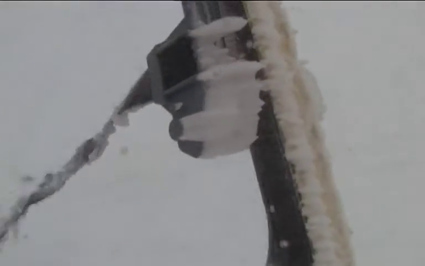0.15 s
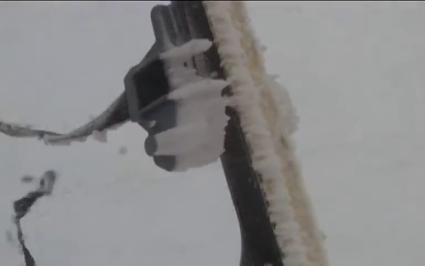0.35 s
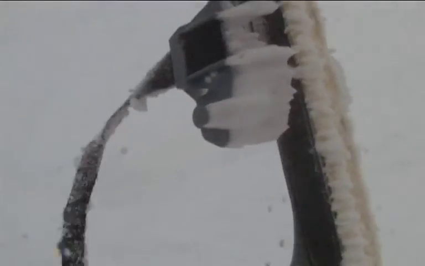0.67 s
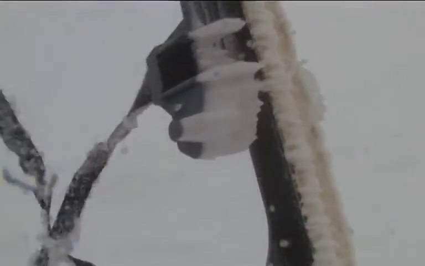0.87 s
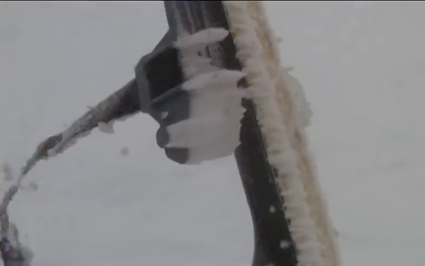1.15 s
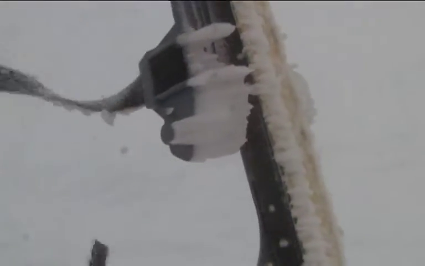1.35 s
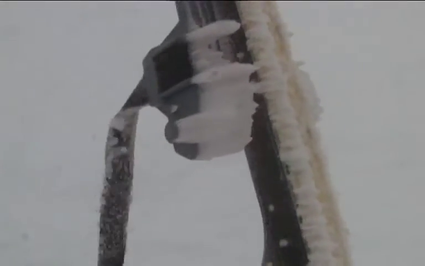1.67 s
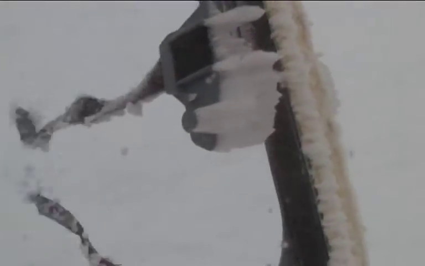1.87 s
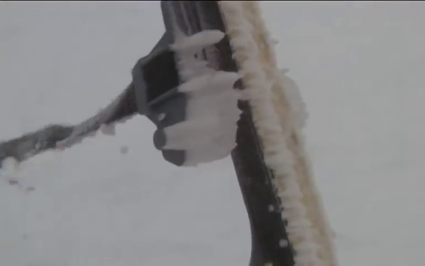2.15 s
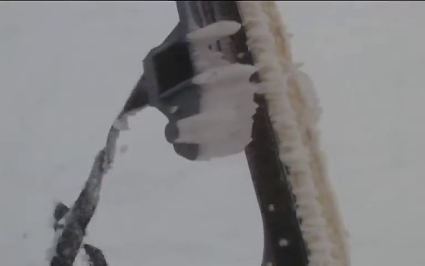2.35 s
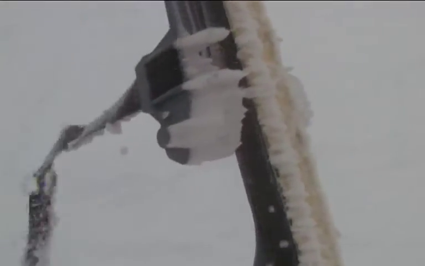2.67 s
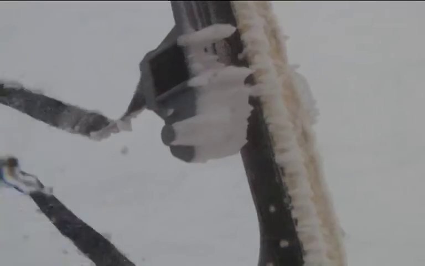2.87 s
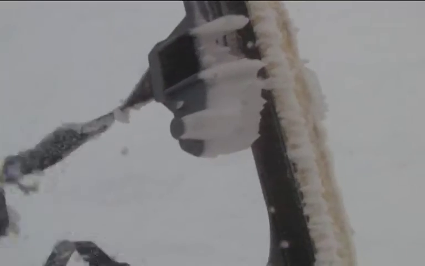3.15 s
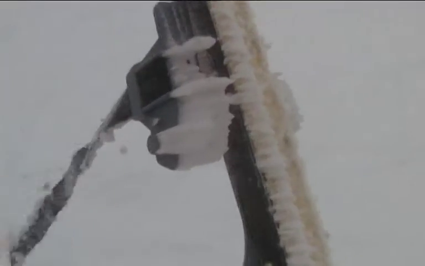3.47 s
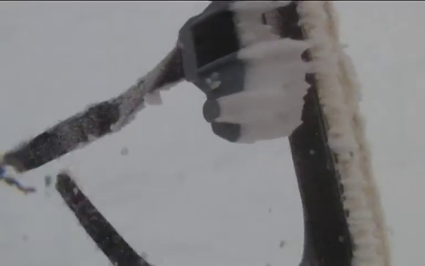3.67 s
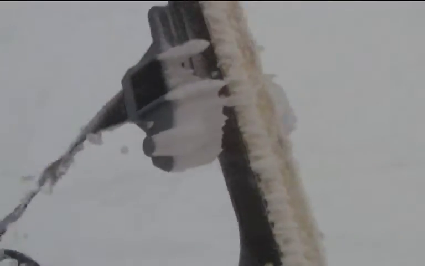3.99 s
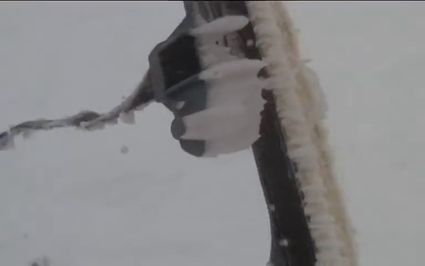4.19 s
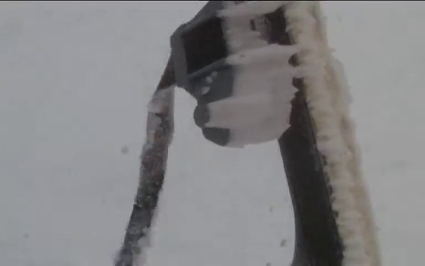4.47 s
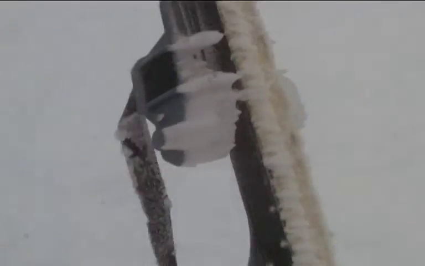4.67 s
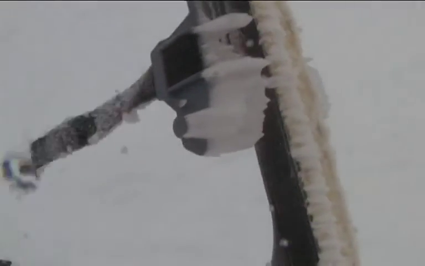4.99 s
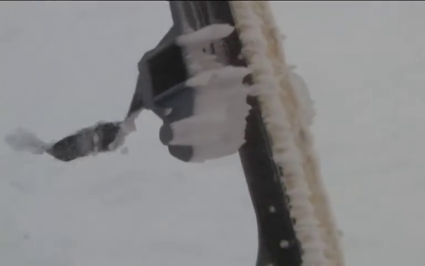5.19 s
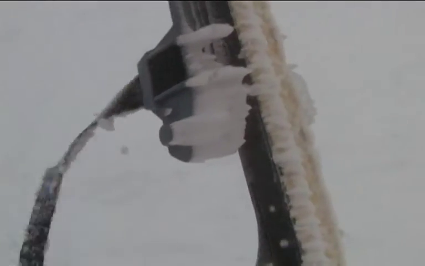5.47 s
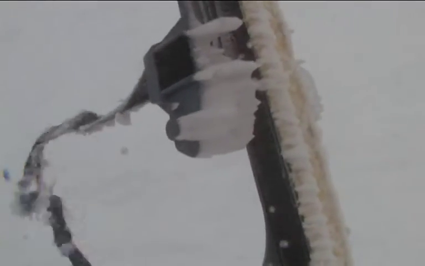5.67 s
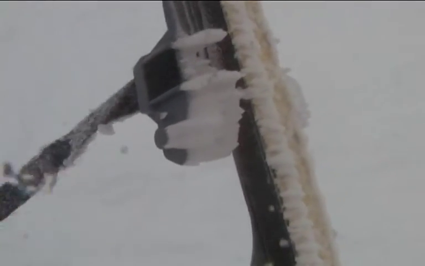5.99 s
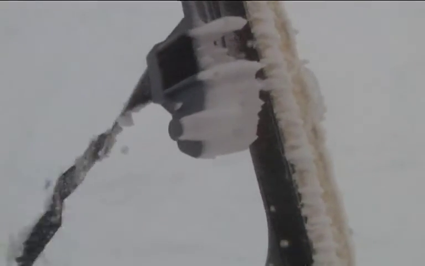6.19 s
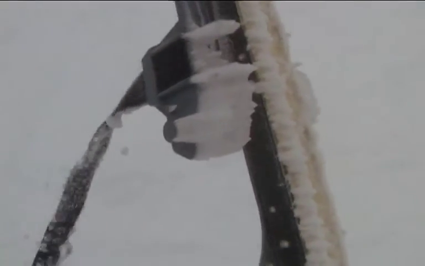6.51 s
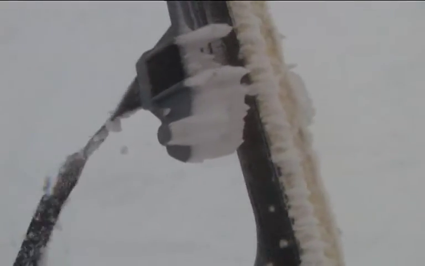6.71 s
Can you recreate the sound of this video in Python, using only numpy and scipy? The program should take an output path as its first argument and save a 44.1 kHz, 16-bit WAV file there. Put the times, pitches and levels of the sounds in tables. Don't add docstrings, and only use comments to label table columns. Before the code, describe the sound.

Outdoors in a blizzard, strong wind hits a small exposed microphone from the first instant: dense low rumble pushing in quick irregular lumps, with rough fluttering hiss from its opening. Ice pellets tick on the plastic shell during the first second, the last a hard, loud click. Fine grains of snow then patter faintly to the end. The loudest pushes saturate.

```python
import sys
import numpy as np
from scipy import signal
from scipy.fft import rfft, irfft, next_fast_len
from scipy.io import wavfile
from scipy.ndimage import uniform_filter1d, map_coordinates

SR = 44100
rng = np.random.default_rng(int(sys.argv[2]) if len(sys.argv) > 2 else 0)


def voltage_ratio(level):
    return 10 ** (np.asarray(level, float) / 20)


def transcribe(signal):
    frames = np.atleast_2d(signal).T
    limited = np.clip(frames, -1, 1)
    pcm = np.round(limited * 32767).astype(np.int16)
    wavfile.write(sys.argv[1], SR, pcm)


N = 302085


def unit(x):
    return x / np.sqrt(np.mean(x ** 2) + 1e-20)


def evened(x, span_s):
    power = x ** 2
    for _ in range(2):
        power = uniform_filter1d(power, size=int(span_s * SR))
    return x / np.sqrt(np.abs(power) + 1e-20)


def along(points, hz):
    f, value = np.transpose(points)
    return np.interp(np.log(hz + 1), np.log(f + 1), value)


def above(hz, edge_hz):
    return 1 / (1 + (edge_hz / (hz + 1)) ** 4)


def peak(hz, centre_hz, width_hz):
    return 1 / (1 + (2 * (hz - centre_hz) / width_hz) ** 2)


def filtered(x, response):
    m = next_fast_len(N + 8192)
    return irfft(rfft(x, m) * response(np.fft.rfftfreq(m, 1 / SR)), m)[..., :N]


def wobble(rate):
    return map_coordinates(rng.standard_normal(2000), [np.arange(N) * rate / SR])


def patchy(depth_db):
    z = signal.stft(rng.standard_normal(N), nperseg=512)[2]
    field = uniform_filter1d(rng.standard_normal(z.shape), size=8, axis=0)
    field = uniform_filter1d(field, size=5, axis=1)
    return unit(signal.istft(z * voltage_ratio(depth_db * unit(field)), nperseg=512)[1][:N])


def swells(rows):
    t = np.arange(0, N, 64) / SR
    s, length, *cols = np.transpose(rows)
    bells = np.exp(-.5 * ((t[:, None] - s) / length) ** 2)
    return [np.interp(np.arange(N) / SR, t, bells @ c) for c in cols]


# (t/s, half length/s, strength/dB, coarseness/dB)
AIR_PUFFS = [(0.229, 0.015, 1.7, 0.8), (0.289, 0.045, 3.2, -1.4), (0.439, 0.015, 1.1, -1.1),
             (0.519, 0.015, 3.7, -0.2), (1.117, 0.015, 2.1, 0.1), (1.192, 0.015, 1.5, -1.1),
             (1.322, 0.015, 3.5, -0.1), (1.527, 0.015, 2.4, 0.4), (1.796, 0.015, 2.2, -1.1),
             (2.02, 0.015, 2.7, -0.7), (2.295, 0.065, 1.9, -0.4), (2.913, 0.02, 2.3, -1.2),
             (3.268, 0.015, 2.5, 0.3), (3.402, 0.02, 3.5, 0.0), (3.741, 0.03, 5.3, -0.4),
             (4.171, 0.015, 2.0, -1.1), (4.35, 0.015, 1.6, 1.7), (4.475, 0.02, 1.7, 0.0),
             (4.54, 0.015, 1.1, -1.0), (4.809, 0.065, 2.0, 0.5), (5.203, 0.03, 4.9, 0.6),
             (5.582, 0.015, 1.6, 1.0), (5.822, 0.015, 2.3, -1.3), (6.091, 0.015, 2.0, 0.3),
             (6.291, 0.015, 3.2, -0.0), (6.346, 0.065, 3.0, 0.2), (6.43, 0.015, 1.8, -0.9),
             (6.585, 0.02, 2.4, -0.2), (6.839, 0.015, 1.8, -0.7)]
# (t/s, half length/s, strength/dB, coarseness/dB)
AIR_LULLS = [(0.055, 0.045, -0.5, -1.7), (0.145, 0.02, -3.0, 0.0), (0.579, 0.015, -1.7, -1.1),
             (0.663, 0.015, -2.1, -0.2), (0.793, 0.03, -2.6, 0.4), (0.968, 0.015, -4.6, -0.2),
             (1.063, 0.015, -4.2, 0.0), (1.267, 0.015, -2.2, -1.0), (1.407, 0.015, -3.0, -0.8),
             (1.596, 0.015, -2.2, -1.1), (1.651, 0.045, -3.2, 0.2), (2.115, 0.045, -4.9, 0.4),
             (2.479, 0.015, -5.4, -0.1), (2.654, 0.015, -2.3, -1.2), (3.198, 0.015, -1.9, -1.0),
             (3.517, 0.03, -3.9, -0.3), (3.637, 0.015, -4.1, -0.2), (3.856, 0.02, -2.0, -1.5),
             (4.036, 0.03, -3.0, 0.8), (4.255, 0.03, -3.0, -0.2), (4.31, 0.015, -2.4, -0.5),
             (5.004, 0.02, -4.1, -0.4), (5.438, 0.015, -3.1, -0.4), (5.527, 0.02, -2.0, -0.7),
             (5.976, 0.065, -2.1, 0.1), (6.141, 0.015, -2.3, 0.4), (6.236, 0.02, -2.3, -0.1),
             (6.675, 0.03, -1.7, 1.2), (6.775, 0.03, -2.9, -0.2)]


def gusted(steady_db, per_strength, per_coarse, flutter_db):
    strength_db, coarse_db = swells(AIR_PUFFS + AIR_LULLS)
    flutter = flutter_db * wobble(22)
    return steady_db + per_strength * strength_db + per_coarse * coarse_db + flutter


def steady_hiss():
    hiss = filtered(rng.standard_normal(N), lambda hz: above(hz, 6000) * (1 - above(hz, 13000)))
    return voltage_ratio(-66) * unit(hiss)


# (t/s, level/dB, rise/s, fall/s)
PORT_RASP = (3.395, -45.5, .018, .03)


def rasp():
    s, level_db, rise_s, fall_s = PORT_RASP
    t = np.arange(N) / SR - s
    noise = filtered(rng.standard_normal(N), lambda hz: peak(hz, 5400, 900))
    envelope = np.exp(-np.abs(t) / np.where(t < 0, rise_s, fall_s))
    return voltage_ratio(level_db) * envelope * unit(noise)


# (f/Hz, width/Hz, level/dB)
SHELL_MODES = [(1970, 400, -8.5), (3530, 1750, 0), (6500, 350, -15), (8450, 600, 1.5), (10600, 950, -.5),
               (12900, 1400, -9.5)]


def struck_shell(t, knock_db, ring_db, bright_db):
    ring = np.zeros(len(t))
    for hz, width, level_db in SHELL_MODES:
        shade_db = knock_db if hz < 5000 else bright_db if hz > 9500 else ring_db
        ring += voltage_ratio(level_db + shade_db) * np.exp(-np.pi * width * t) * np.sin(2 * np.pi * hz * t)
    return ring


# (t/s, level/dB, low knock/dB, shell ring/dB, brightness/dB)
ICE_PELLETS = [(0.0712, -26, 0, -4, 4), (0.0902, -30, 2, -4, 0), (0.0921, -33, 0, -7, 0),
               (0.4644, -34, 0, -4, 0), (0.5097, -23.5, 0, -4, 0), (0.5676, -21, 2, -3, 0),
               (0.6314, -32, 0, -4, 0), (0.7962, -24, 3, -8, 6), (0.8104, -38, 0, -4, 0),
               (0.845, -17.5, -3, -5, 5), (0.9664, -7.5, 3.5, -1, 0)]
# (t/s, level/dB)
SNOW_GRAINS = [(1.1346, -31), (2.2351, -35), (2.499, -38), (2.732, -37), (2.751, -33), (3.0184, -30),
               (3.4264, -32), (3.4623, -33), (3.5217, -33), (3.5511, -35), (3.7073, -32), (3.9328, -39),
               (3.9522, -33), (4.0136, -35), (4.1588, -34), (4.1787, -28), (4.3374, -32), (4.3927, -34),
               (4.7419, -36), (5.4668, -35), (5.5651, -36), (5.9257, -33), (5.9442, -31), (6.0639, -34),
               (6.0754, -29), (6.2784, -31), (6.3323, -34), (6.7284, -32), (6.7559, -33), (6.7733, -31)]


def pellets():
    out, t = np.zeros(N + 1024), np.arange(1024) / SR
    faint = [(u * (N - 99) / SR, -39 + 2 * (2 * v - 1)) for u, v in rng.random((25, 2))]
    grains = [(s, db - .3, -12, -5, 3) for s, db in SNOW_GRAINS + faint]
    for s, db, knock_db, ring_db, bright_db in ICE_PELLETS + grains:
        ring = struck_shell(t, knock_db, ring_db, bright_db)
        crumble_ms = np.clip(.7 * voltage_ratio(.2 * db), .05, 2)
        crumble = rng.standard_normal(256) * np.exp(-1000 * t[:256] / crumble_ms)
        blow = .45 * crumble / np.linalg.norm(crumble)
        blow[0] += .9
        start = round((s + .0006) * SR)
        out[start:start + len(t)] += voltage_ratio(db + 3) * np.convolve(ring, blow)[:len(t)]

    def body(hz):
        hollow = 1 - .85 * peak(hz, 5600, 1300)
        return (1 - above(hz, 13500)) * above(hz, 1500) ** 2 * hollow
    return filtered(out[:N], body)


# (f/Hz, level/dB per Hz)
PORT_AIR = [(1290, -2), (2200, -7.5), (3020, -12), (3900, -4.5), (4880, -9.5), (5350, -10), (5860, -9.5),
            (7210, -8), (8440, -11), (14800, -26.5), (16000, -27)]
# (f/Hz, width/Hz, level/dB)
PORT_MODES = [(3600, 1200, 2.5), (5330, 260, 5.5), (7040, 620, 1.5), (10400, 790, 1.5)]


def port_hiss(lump, jolt, whisper_db):
    def port(hz):
        modes_db = sum(db * peak(hz, centre, width) for centre, width, db in PORT_MODES)
        return voltage_ratio(along(PORT_AIR, hz) + modes_db)
    hiss_db = gusted(-42.5, .75, -.45, .4) + .9 * whisper_db
    top_db = gusted(-48.7, 1.3, -.8, .5) + 1.1 * whisper_db
    air = patchy(1.06) * voltage_ratio(1.24 * lump + .8 * jolt)
    hiss = filtered(air, lambda hz: port(hz) * (1 - above(hz, 5800)))
    hiss = hiss * voltage_ratio(.21 * wobble(30) + 1.3 * wobble(90))
    speck_db = np.minimum(4 * rng.exponential(size=N), 12)
    snow = rng.standard_normal(N) * voltage_ratio(speck_db) * (rng.random(N) < 300 / SR)
    top = filtered(air + .46 * unit(snow), lambda hz: port(hz) * above(hz, 7200))
    top = top * voltage_ratio(.8 * wobble(38) + 1.7 * wobble(70) + 1.9 * wobble(150))
    return voltage_ratio(hiss_db) * evened(hiss, .037) + voltage_ratio(top_db) * evened(top, .07)


# (f/Hz, level/dB per Hz)
EDDY_PRESSURE = [(8.8, -50), (15, -23), (76, -1), (131, 1.5), (470, -7.5), (851, -16.5), (2660, -42.5),
                 (3500, -48), (4550, -59), (7700, -120)]
# (t/s, half length/s, strength/dB)
BIG_BUFFETS = [(0.369, 0.045, -3.1), (0.659, 0.02, 4.2), (0.728, 0.015, 3.8), (0.963, 0.02, -4.6),
               (1.222, 0.045, 2.9), (1.462, 0.02, 3.6), (1.606, 0.03, -5.4), (1.746, 0.015, 4.8),
               (1.926, 0.045, 5.0), (2.075, 0.02, -4.6), (2.22, 0.03, 3.7), (2.454, 0.03, -5.0),
               (2.624, 0.065, -1.9), (2.978, 0.015, -4.6), (3.422, 0.03, -4.8), (3.627, 0.03, 4.7),
               (3.996, 0.03, 3.0), (4.205, 0.015, 3.5), (4.26, 0.015, -3.5), (4.57, 0.015, 5.5),
               (4.654, 0.015, 3.6), (4.969, 0.02, -5.3), (5.113, 0.02, 3.9), (5.323, 0.065, -3.1),
               (5.647, 0.015, 4.5), (5.792, 0.03, 3.8), (5.951, 0.065, 1.8), (6.156, 0.015, 4.4),
               (6.281, 0.015, 3.9), (6.485, 0.09, -1.6)]
# (t/s, half length/s, strength/dB)
EDGE_SWIRLS = [(0.19, 0.015, -1.6), (0.304, 0.015, 2.1), (0.354, 0.015, -2.6), (0.489, 0.015, -1.9),
               (0.619, 0.015, 1.6), (0.698, 0.015, 1.6), (0.888, 0.03, 1.4), (1.053, 0.015, 2.1),
               (1.083, 0.015, -2.8), (1.651, 0.015, 2.0), (1.696, 0.015, -3.0), (1.756, 0.015, -3.0),
               (1.876, 0.015, 1.5), (2.21, 0.045, 1.4), (2.375, 0.03, -2.0), (2.569, 0.015, -1.6),
               (2.724, 0.015, -2.5), (2.764, 0.015, 2.3), (2.809, 0.015, -2.4), (2.953, 0.015, 2.0),
               (3.682, 0.015, 2.5), (4.011, 0.015, -1.7), (4.659, 0.015, 1.6), (5.158, 0.015, 1.9),
               (5.353, 0.015, 1.7), (5.767, 0.015, 2.6), (5.867, 0.015, -1.6), (5.922, 0.02, 1.4),
               (6.46, 0.015, -1.6), (6.505, 0.015, 1.7)]


def eddies(lump, jolt, curl_db):
    swirl_db = swells(EDGE_SWIRLS)[0]
    big_db = gusted(-19, .8, .1, 1.0) + 1.05 * swells(BIG_BUFFETS)[0]
    middle_db = gusted(-18.4, .95, 1.9, .7) + 1.1 * swirl_db
    small_db = gusted(-27.6, 1.25, -.35, .6) + .3 * swirl_db + curl_db
    pops = unit(-voltage_ratio(3 * rng.exponential(size=N)) * (rng.random(N) < 250 / SR))
    swarm = patchy(1.1) + .38 * (pops - pops.mean())

    def sized(share):
        return filtered(swarm, lambda hz: voltage_ratio(along(EDDY_PRESSURE, hz)) * share(hz))
    big = sized(lambda hz: 1 - above(hz, 183))
    middle = sized(lambda hz: above(hz, 227) * (1 - above(hz, 706)))
    small = sized(lambda hz: above(hz, 855))
    big = voltage_ratio(big_db) * evened(big * voltage_ratio(.78 * lump), .064)
    middle = voltage_ratio(middle_db) * evened(middle * voltage_ratio(1.8 * lump + 1.6 * jolt), .046)
    small = voltage_ratio(small_db) * evened(small * voltage_ratio(2.5 * lump + 1.7 * jolt), .038)
    return big + middle + small


# (t/s, half length/s, small eddies/dB, hiss/dB)
BRIEF_SHIFTS = [(0.205, 0.012, -3.5, -0.9), (0.494, 0.012, -3.1, -1.1), (0.823, 0.012, -3.0, -0.7),
                (0.943, 0.018, 2.8, 0.2), (1.736, 0.03, -2.1, -1.4), (1.951, 0.012, 3.2, 0.4),
                (2.185, 0.012, -2.7, -1.4), (2.38, 0.07, 1.4, -0.6), (2.564, 0.012, -3.3, -0.4),
                (2.604, 0.018, 2.1, 1.2), (2.719, 0.012, -3.2, -1.7), (3.023, 0.018, -2.7, -0.6),
                (3.312, 0.012, 1.9, -2.9), (3.482, 0.012, 3.6, -1.7), (3.597, 0.07, -1.5, -0.0),
                (3.786, 0.012, 4.1, -0.0), (3.921, 0.012, -1.7, -3.0), (4.28, 0.018, 2.3, 0.3),
                (4.62, 0.018, -2.0, -2.1), (4.824, 0.018, -2.4, -0.1), (5.143, 0.012, -5.3, -1.3),
                (5.368, 0.045, 1.8, -0.1), (5.732, 0.012, -3.5, -0.1), (5.882, 0.012, -3.4, -0.3),
                (5.956, 0.012, -3.0, 0.3), (6.056, 0.018, -3.5, -0.3), (6.221, 0.012, 3.4, -1.0),
                (6.266, 0.012, -2.6, -1.6), (6.76, 0.018, -1.4, 1.9), (6.815, 0.018, -3.0, -1.6)]


def wind():
    lump, jolt = wobble(40), wobble(160)
    curl_db, whisper_db = swells(BRIEF_SHIFTS)
    return port_hiss(lump, jolt, whisper_db) + eddies(lump, jolt, curl_db)


def scene():
    return (steady_hiss() + rasp() + pellets() + wind())[None]


def top_cut(x):
    return signal.sosfilt(signal.butter(12, 16270, fs=SR, output="sos"), x)


def record(dry):
    held = dry / (1 + np.abs(dry / 1.06) ** 14) ** (1 / 14)
    mix = filtered(held, lambda hz: hz < 15760)
    return top_cut(mix)


dry = scene()
out = record(dry)
transcribe(out)
```